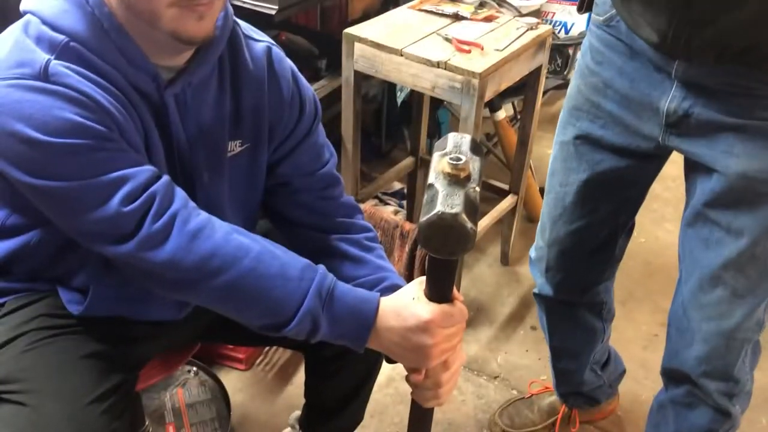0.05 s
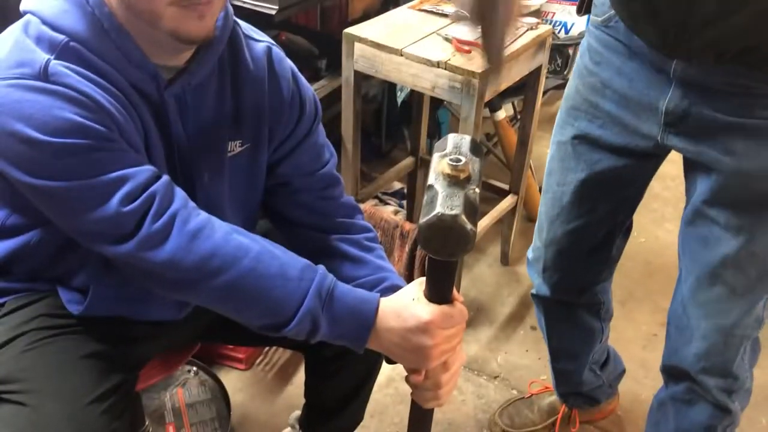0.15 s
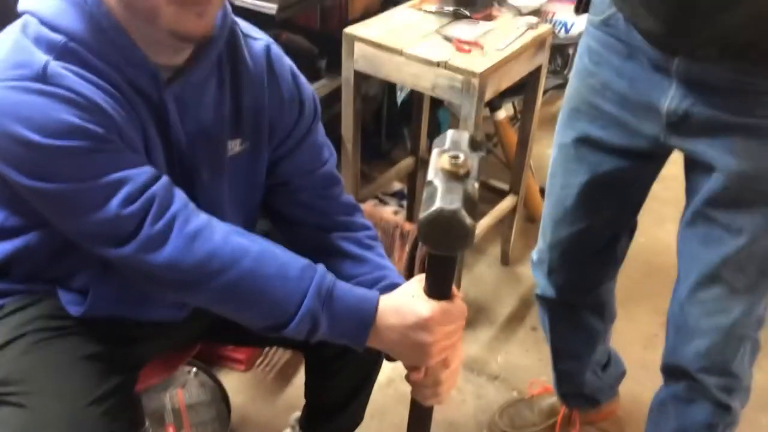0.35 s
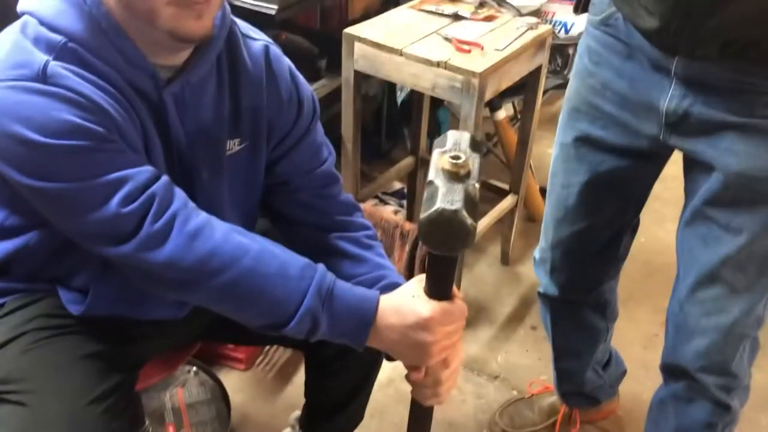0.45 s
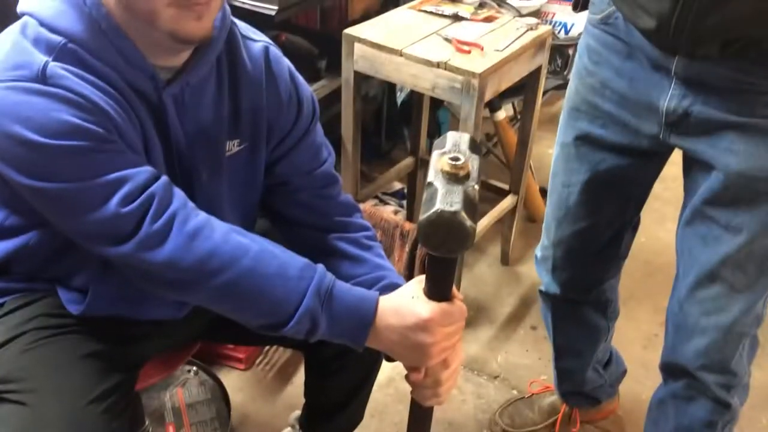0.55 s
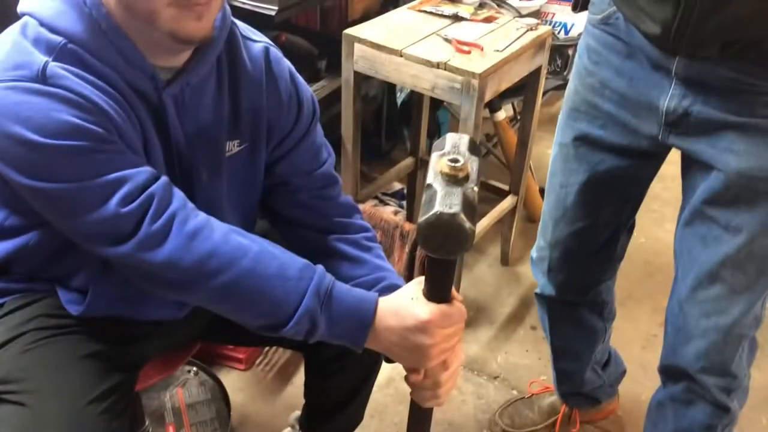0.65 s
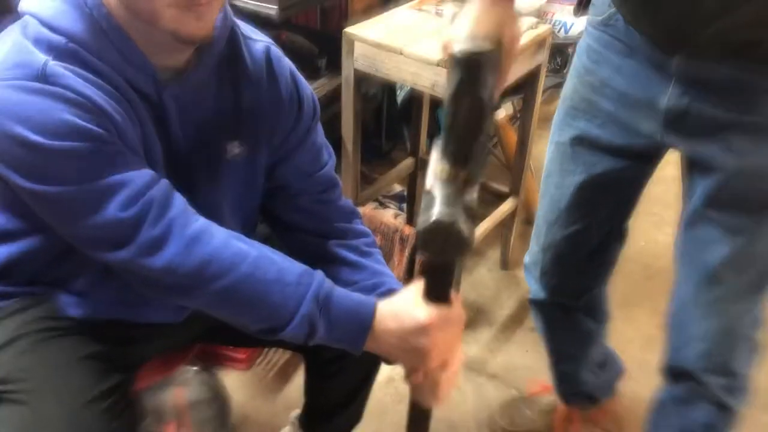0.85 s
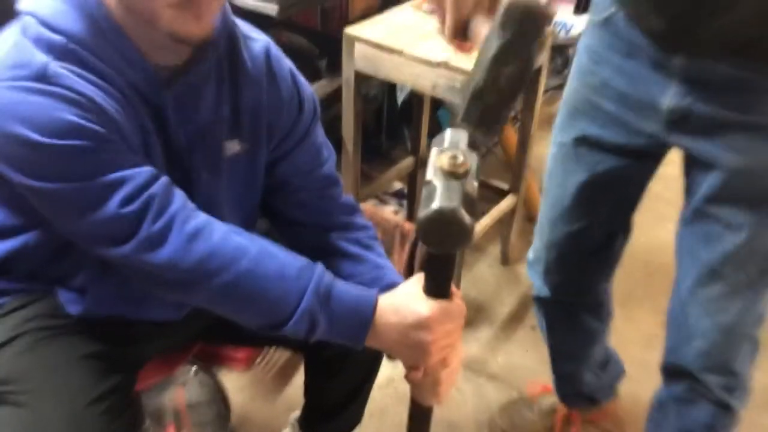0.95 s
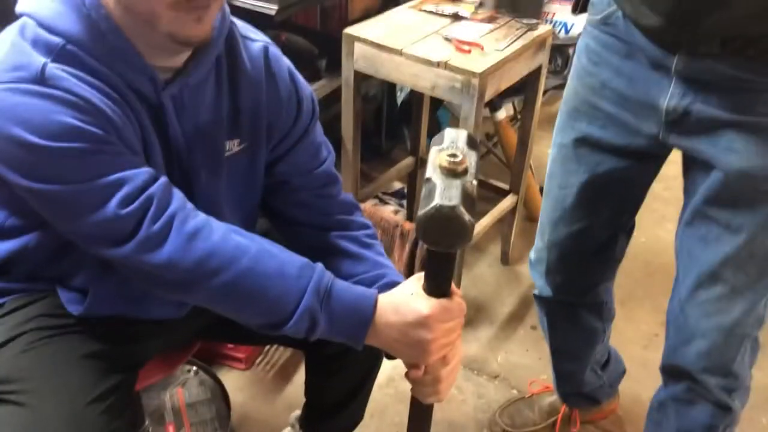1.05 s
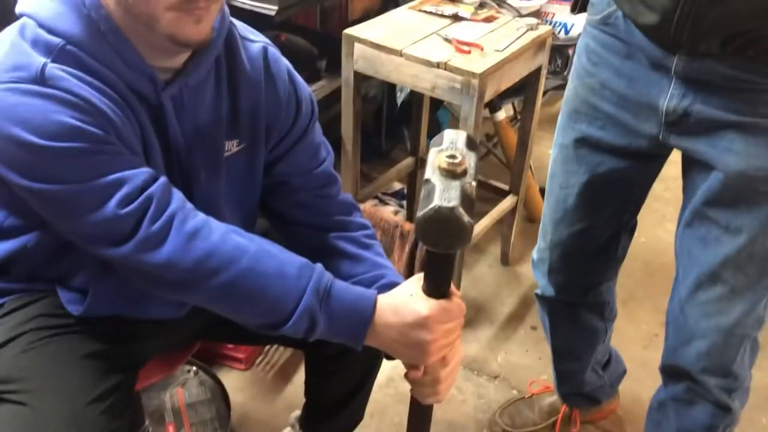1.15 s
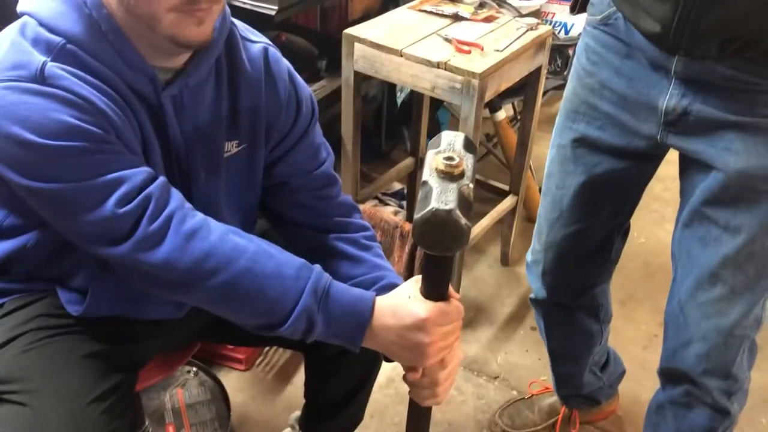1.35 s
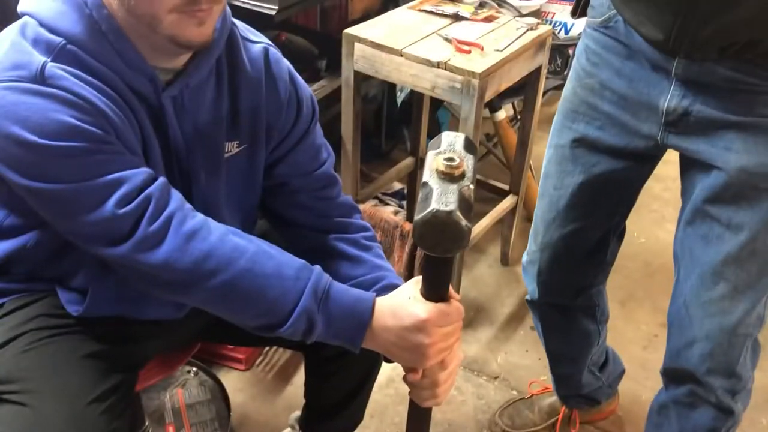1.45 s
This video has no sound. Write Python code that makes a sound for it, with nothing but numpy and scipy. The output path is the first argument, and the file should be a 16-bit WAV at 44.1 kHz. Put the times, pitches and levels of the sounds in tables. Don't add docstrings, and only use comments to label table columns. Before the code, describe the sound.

Two loud hammer blows on a steel wedge in a sledgehammer head, each a sharp crack with short ring and floor thump, then faint tool jingle; close microphone overloads in a live workshop.

```python
import sys
import numpy as np
from scipy import signal
from scipy.io import wavfile
from scipy.ndimage import uniform_filter1d

SR = 44100
rng = np.random.default_rng(int(sys.argv[2]) if len(sys.argv) > 2 else 0)


def dump(signal):
    limited = np.clip(np.atleast_2d(signal).T, -1, 1)
    pcm = np.round(limited * 32767).astype(np.int16)
    wavfile.write(sys.argv[1], SR, pcm)


def convert_level_to_amplitude(level_db):
    exponent = np.asarray(level_db, float) / 20
    return 10 ** exponent


N = 66150

# (frequency [Hz], level [dB per Hz])
CRACK_COLOUR = [(200, -36), (600, -6.5), (1300, -1), (2300, -7), (3500, -0.5), (5500, -9.5), (8500, -9),
                (11500, -22), (16500, -28)]


def hammer_crack(t):
    level_db, t60_s, rise_s = -1, 0.02816, 0.0003
    envelope = convert_level_to_amplitude(level_db - 60 * t / t60_s) * (1 - np.exp(-t / rise_s))
    burst = envelope * rng.standard_normal(len(t))
    click = np.linalg.norm(burst) * (t == 0)
    return coloured(burst, CRACK_COLOUR), coloured(click, CRACK_COLOUR)


# (frequency [Hz], level [dB], T60 [s])
STEEL_MODES = [(1660.1, -18, .07), (2090, -26, 0.067), (2714, -19.5, 0.084), (3359, -21, 0.073),
               (3544, -12, .045), (4186, -15, 0.033), (6220, -26, .05), (7500, -27, .06), (8813, -26.5, .2),
               (9636, -9, .05), (11200, -40, .12), (13250, -44, .16)]


def steel_ring(t, level_db):
    return ring(STEEL_MODES, t, level_db)


# (frequency [Hz], level [dB], T60 [s])
FLOOR_MODES = [(37.64, -21, 0.41), (84, -18, .35), (99.4, -16, .2), (176.09, -8, .17), (247.1, -1, .09),
               (296.8, -13, .13), (324.78, -15, .11), (371, -16, .12), (422.55, -19, .13),
               (665.5, -20, .18), (942, -28, .1), (1102.6, -25, .11)]


def floor_thump(t, level_db):
    lag_s, rise_s = 0.0036, 0.002
    push_s, boom_lag_s, boom_db = 0.006, 0.012, 0
    late = np.maximum(t - lag_s, 0)
    thump = -(1 - np.exp(-late / rise_s)) * ring(FLOOR_MODES, late, level_db)
    push = convert_level_to_amplitude(boom_db) * thump * np.exp(-late / push_s)
    return thump, np.roll(push, round(boom_lag_s * SR))


def blow(room, strength_db, steel_db, thump_db):
    room_db, steel_room_db = -8.5, -6.5
    t = np.arange(SR) / SR
    crack, click = hammer_crack(t)
    steel = steel_ring(t, steel_db)
    thump, push = floor_thump(t, thump_db)
    into_room = convert_level_to_amplitude(room_db) * (click + convert_level_to_amplitude(steel_room_db) * steel) + push
    wet = signal.fftconvolve(into_room, room)[:SR]
    return convert_level_to_amplitude(strength_db) * (crack + steel + thump + wet)


# (time [s], strength [dB], steel ring [dB], floor thump [dB])
BLOW_TIMES = [
    (.2014, 0, 0, -0.5),
    (.8755, 0, -0.5, 0),
]


def hammer_blows():
    shift = 0.4
    out, shared_room = np.zeros(N), room_response()
    for s, strength_db, steel_db, thump_db in BLOW_TIMES:
        room = np.sqrt(1 - shift ** 2) * shared_room + shift * room_response()
        add(out, s, blow(room, strength_db, steel_db, thump_db))
    return out


# (frequency [Hz], T60 [s])
ROOM_DECAY = [(40, .7), (120, 0.51), (200, .36), (550, .4), (1200, .34), (3000, .32), (6000, .27),
              (10000, .18), (16000, 0.11)]
# (frequency [Hz], level [dB per Hz])
ROOM_COLOUR = [(20, -0.5), (95, 5), (145, -6), (260, -3), (600, 3), (1300, 0), (4000, -0.5), (9000, 0),
               (16000, -3.5)]


def room_response():
    rise_s = 0.0036
    t = np.arange(SR) / SR
    noise = coloured(rng.standard_normal(SR), ROOM_COLOUR)
    hz, when, z = signal.stft(noise, SR, nperseg=256, noverlap=192)
    decay = convert_level_to_amplitude(-60 * when / read(ROOM_DECAY, hz)[:, None])
    tail = signal.istft(z * decay, SR, nperseg=256, noverlap=192)[1][:SR]
    tail = (1 - np.exp(-t / rise_s)) * tail
    return tail / np.linalg.norm(tail)


# (frequency [Hz], level [dB], T60 [s])
TOOL_MODES = [(1669, -14.5, .5), (2100, -5, 0.2075), (2370, -4.5, 0.174), (2700, 1, 0.2239),
              (2867, -8, 0.1162), (3333, -11.5, 0.39), (3670, -4, 0.24), (4044, -16, .4),
              (4207.6, -8, 0.4121), (5100, -15, .07), (6154, -16, .07), (6750, -18, 0.05),
              (8300, -19.5, .12), (8660, -38, .15)]
# (time [s], level [dB], brightness [dB per octave])
TOOL_KNOCKS = [(.3, -56.5, 0), (.36, -56.5, 0), (.385, -55, -1.86), (.424, -55, 2.2), (.445, -56, -1),
               (.975, -54.5, 0), (1.04, -53.5, 0.1), (1.075, -58.5, -0.19), (1.1, -59, 1.2),
               (1.14, -62.5, -0.11), (1.175, -63.5, 0.16)]


def loose_tools():
    spread_db, chatter_s = 2, 0.01
    out, t = np.zeros(N), np.arange(SR // 2) / SR
    octaves = np.log2(np.array(TOOL_MODES)[:, :1] / 2700)
    for s, level_db, bright_db in TOOL_KNOCKS:
        luck_db = spread_db * rng.standard_normal((len(TOOL_MODES), 1))
        rung = ring(TOOL_MODES, t, level_db + bright_db * octaves + luck_db)
        chatter = rng.standard_normal(len(t)) * np.exp(-t / chatter_s)
        add(out, s, signal.fftconvolve(rung, chatter / np.linalg.norm(chatter)))
    return out


# (time [s], level [dB], frequency [Hz], T60 [s])
DRY_TICK = (1.3112, -41, 1200, .01)


def dry_tick():
    out, t = np.zeros(N), np.arange(SR // 2) / SR
    s, level_db, hz, t60_s = DRY_TICK
    add(out, s, -convert_level_to_amplitude(level_db - 60 * t / t60_s) * np.sin(2 * np.pi * hz * t))
    return out


# (frequency [Hz], level [dB per Hz])
HUSH_COLOUR = [(15, 0), (110, -9), (200, -21), (500, -23.5), (1200, -29), (4200, -35.5), (5200, -42.5),
               (10000, -52), (13000, -68)]
# (frequency [Hz], width [Hz], level over the hiss [dB])
HUM_LINES = [(413.4, 10, 9), (533, 12, 5), (1683, 10, 4.5)]


def room_tone():
    level_db, patch_db = -53, 1.5
    hz = np.fft.rfftfreq(2048, 1 / SR)
    real, imaginary, patches = rng.standard_normal((3, len(hz), N // 512 + 5))
    patches = uniform_filter1d(patches, size=16, axis=0)
    patches = evened(uniform_filter1d(patches, size=6, axis=1))
    colour_db = read(HUSH_COLOUR, hz)
    for line_hz, width_hz, line_db in HUM_LINES:
        colour_db = colour_db + line_db * np.exp(-((hz - line_hz) / width_hz) ** 2)
    z = (real + 1j * imaginary) * convert_level_to_amplitude(colour_db[:, None] + patch_db * patches)
    return convert_level_to_amplitude(level_db) * evened(signal.istft(z, nperseg=2048, noverlap=1536)[1][:N])


def read(points, hz):
    f, value = np.transpose(points)
    return np.interp(np.log(hz + 1), np.log(f + 1), value)


def evened(x):
    return x / np.sqrt(np.mean(x ** 2) + 1e-20)


def add(mix, s, sound):
    part = mix[round(s * SR):][:len(sound)]
    part += sound[:len(part)]


def coloured(x, table):
    log_gain = np.log(convert_level_to_amplitude(read(table, abs(np.fft.fftfreq(8192, 1 / SR)))))
    taps = np.fft.ifft(np.exp(np.conj(signal.hilbert(log_gain)))).real[:4096]
    return signal.fftconvolve(x, taps / np.linalg.norm(taps))[:len(x)]


def ring(modes, t, extra_db=0):
    hz, level_db, t60_s = np.transpose(modes)[:, :, None]
    envelopes = convert_level_to_amplitude(level_db + extra_db - 60 * t / t60_s)
    return (envelopes * np.sin(2 * np.pi * hz * t)).sum(0)


def limited(x, hz):
    taps = signal.firwin(127, min(hz, 20000), window=("kaiser", 9), fs=SR)
    return signal.oaconvolve(x, taps[None], "same")


def scene():
    return (hammer_blows() + loose_tools() + dry_tick() + room_tone())[None]


def roll_off(x):
    return signal.sosfilt(signal.butter(12, 17140, fs=SR, output="sos"), x)


def record(dry):
    clip_level, knee = 0.69, 5
    heard = limited(dry, 15700)
    clipped = heard / (1 + abs(heard / clip_level) ** knee) ** (1 / knee)
    finished = limited(clipped, 16600)
    return roll_off(finished)


dry = scene()
out = record(dry)
dump(out)
```